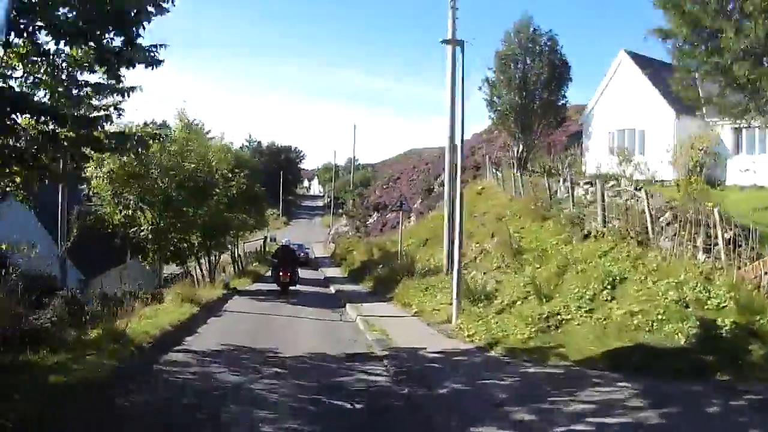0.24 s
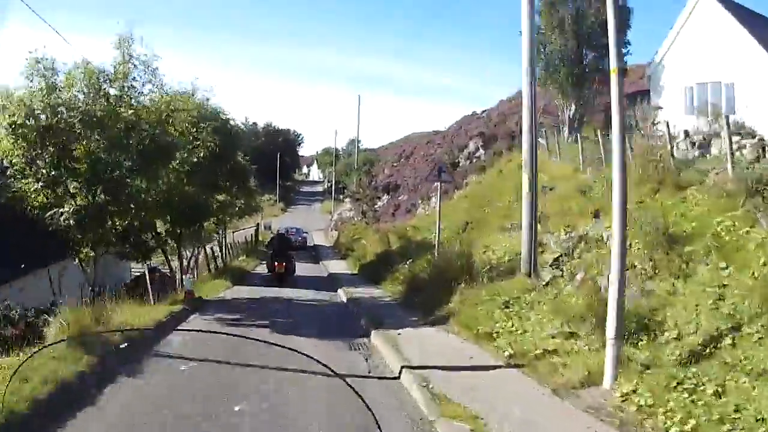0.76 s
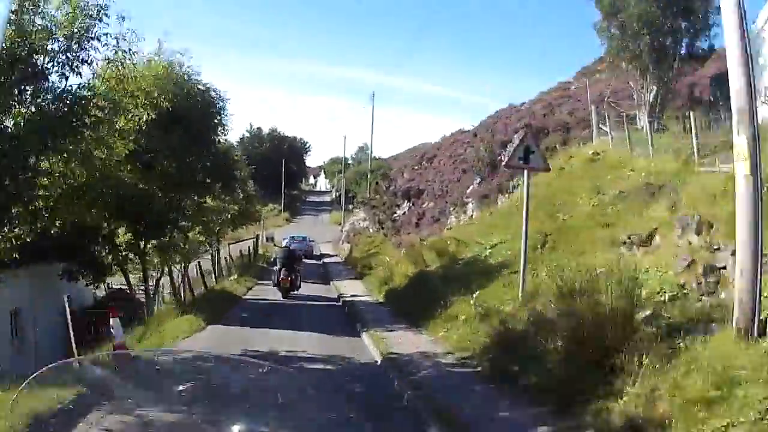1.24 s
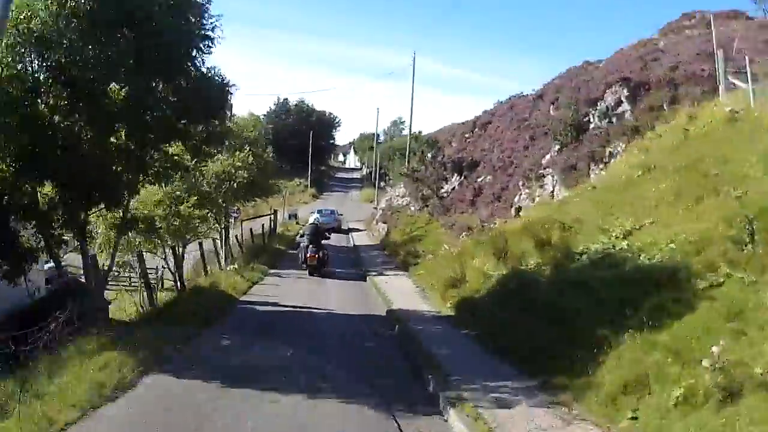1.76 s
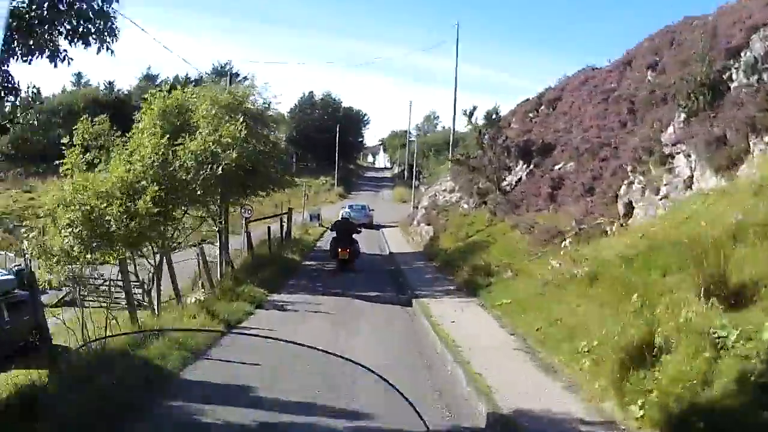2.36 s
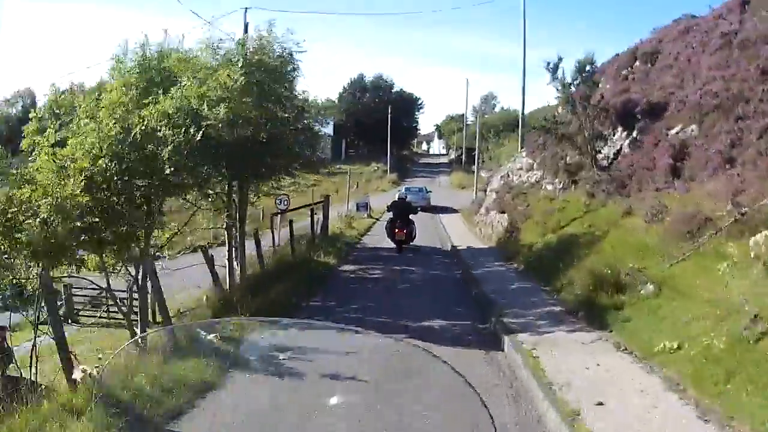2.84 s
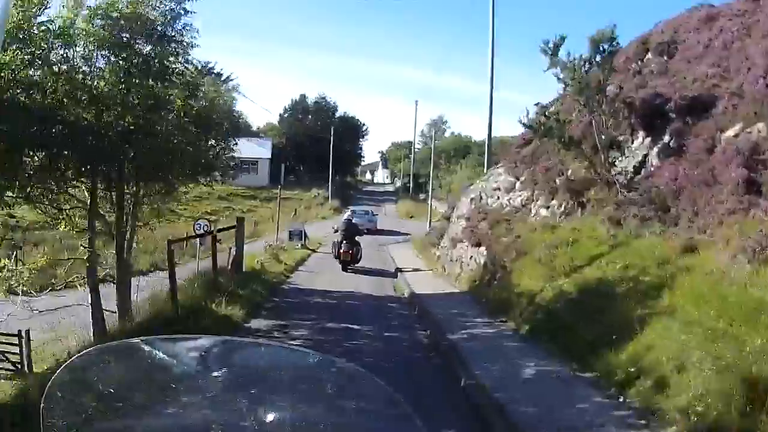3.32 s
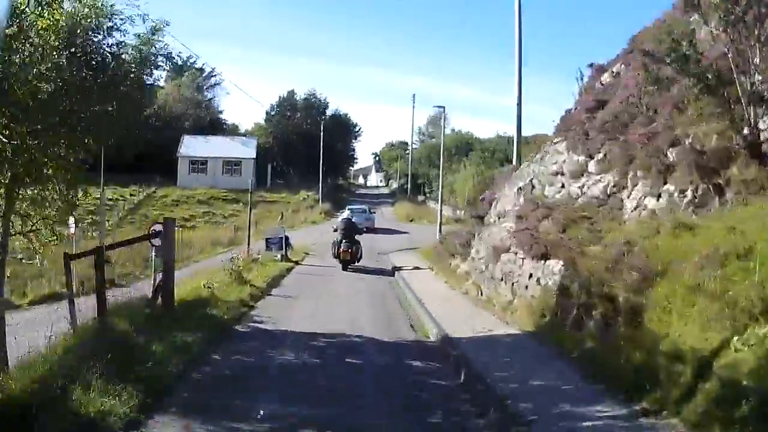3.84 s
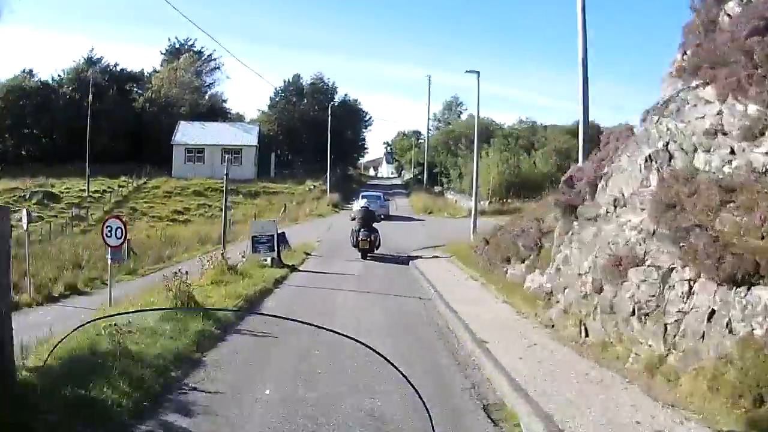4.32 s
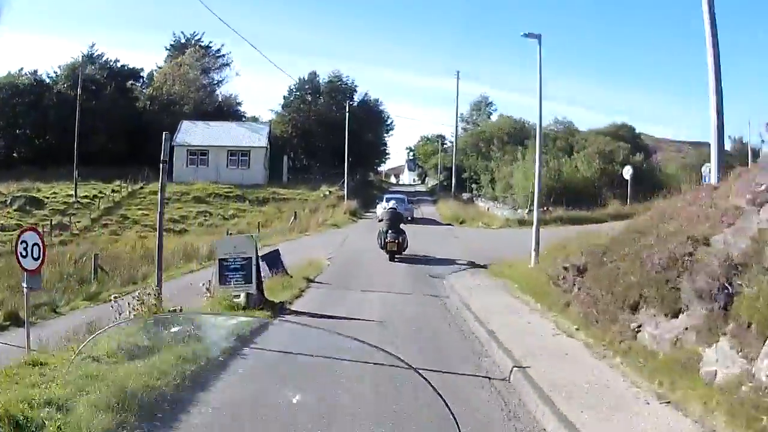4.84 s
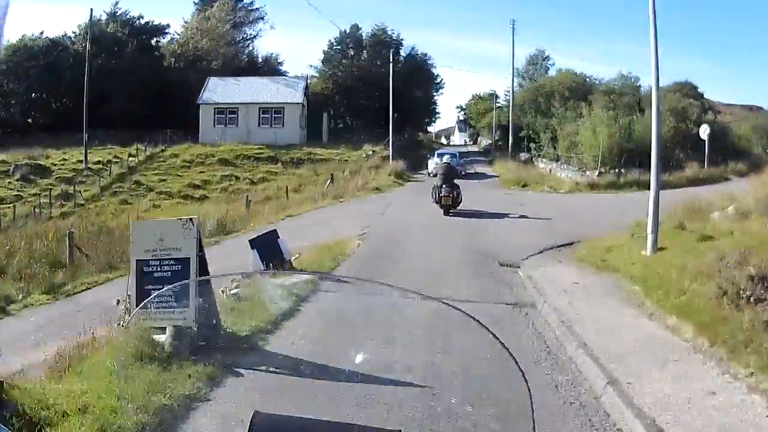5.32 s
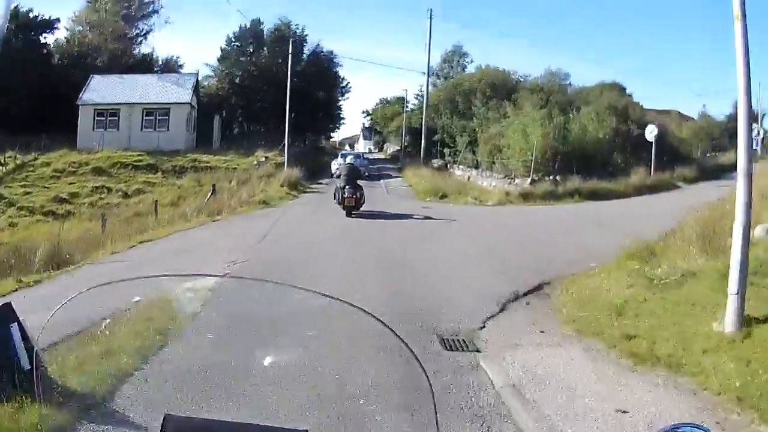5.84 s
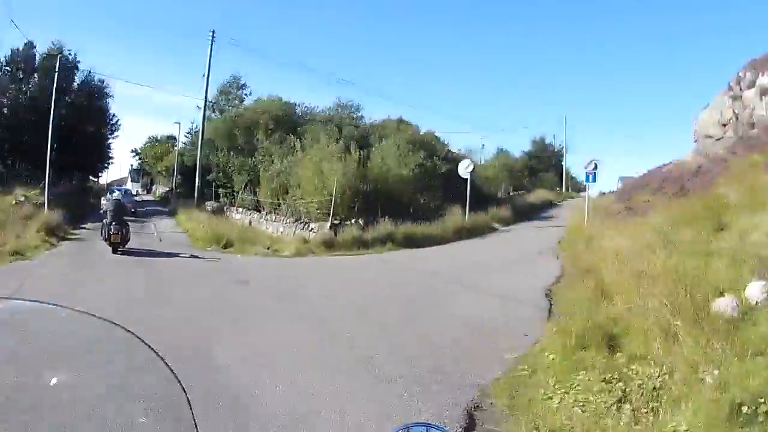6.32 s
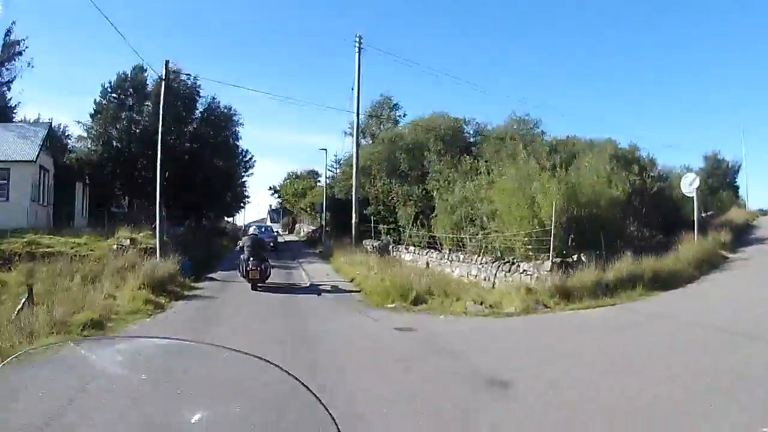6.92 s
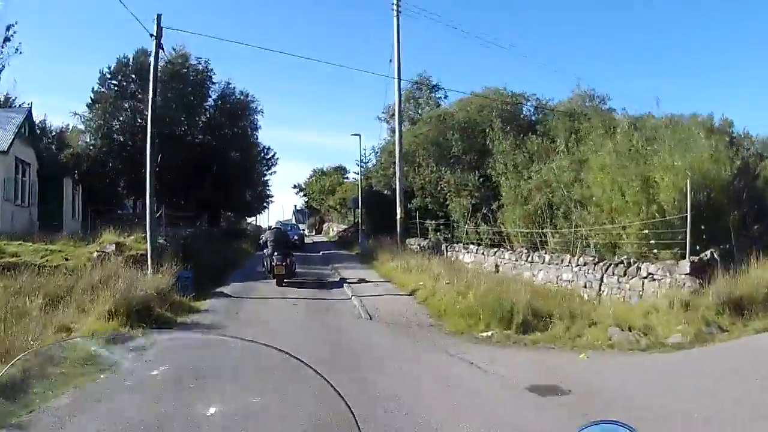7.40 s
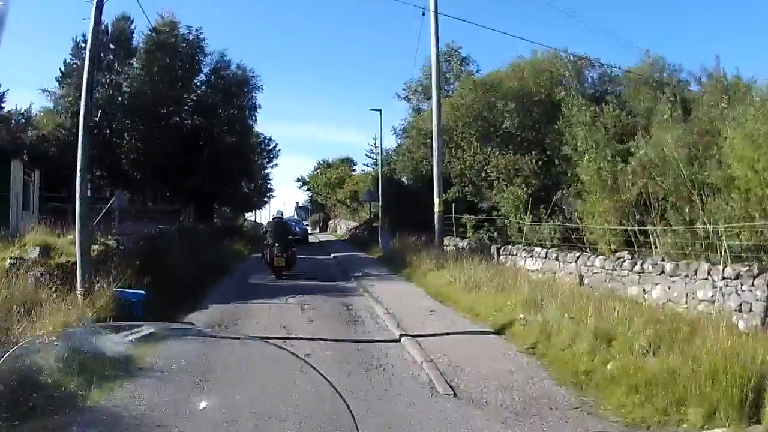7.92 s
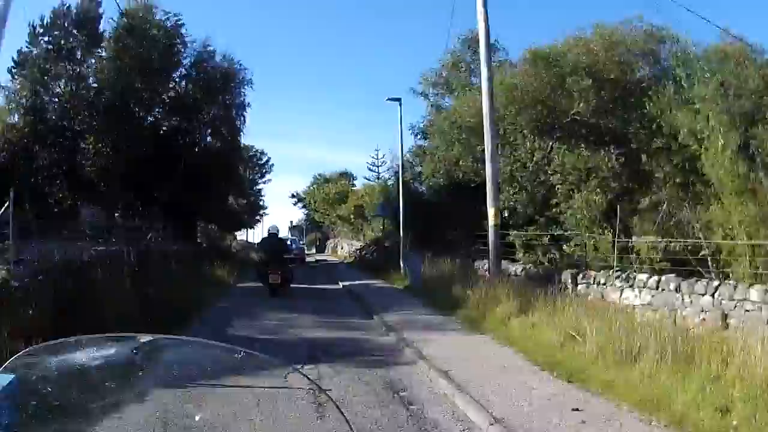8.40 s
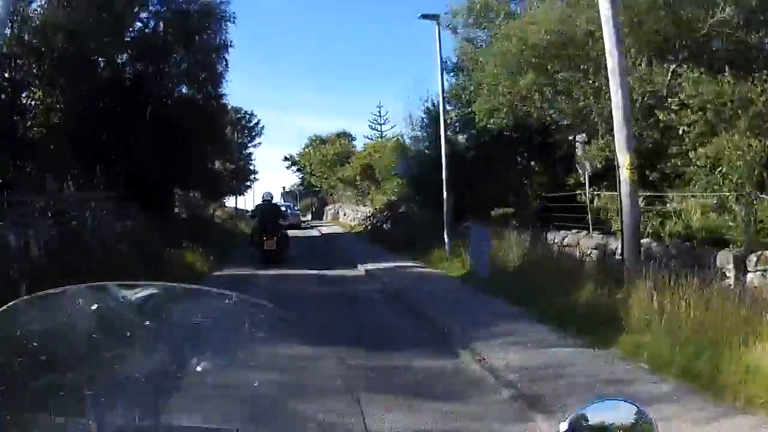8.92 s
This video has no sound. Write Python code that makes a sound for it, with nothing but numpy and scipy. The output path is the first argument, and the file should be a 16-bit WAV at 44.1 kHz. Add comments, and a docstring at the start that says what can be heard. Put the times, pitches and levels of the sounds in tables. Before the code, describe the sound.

Loud rasping wind gusts over the microphone of a moving motorcycle, with a low engine hum and road hiss underneath.

```python
"""Wind noise on a motorcycle

A motorcycle rolls along a narrow village road, heard at a microphone behind its windscreen. Turbulent
eddies excite the microphone port's resonance near 4 kHz in rasping bursts that overload the input.
Below them the wind buffets the housing, an edge whistles, cavities ring and the tyres hiss, while the
engine hums low, picking up after a junction."""
import sys
import numpy as np
from scipy import signal
from scipy.fft import rfft, irfft, next_fast_len
from scipy.io import wavfile
from scipy.ndimage import uniform_filter1d

SR = 44100
rng = np.random.default_rng(int(sys.argv[2]) if len(sys.argv) > 2 else 0)


def wrap_up_sound(samples):
    """Save the sound to the file named by the first command line argument, as 16-bit audio."""
    columns = np.atleast_2d(samples).T
    # keep every value between -1 and 1, then stretch to whole-number steps
    tamed = np.clip(columns, -1, 1)
    steps = np.round(tamed * 32767).astype(np.int16)
    wavfile.write(sys.argv[1], SR, steps)


N = 403956
TIME = np.arange(N) / SR


def undb(db):
    """Amplitude ratio of a level in decibels."""
    return 10 ** (np.asarray(db) / 20)


def unit(x):
    """Normalisation to a standard deviation of 1."""
    return x / np.std(x)


def curves(table):
    """Linear interpolation in time of each column after the first."""
    times, *columns = np.transpose(table)
    return [np.interp(TIME, times, column) for column in columns]


def spectrum_gain(freqs, points):
    """Interpolation of (frequency [Hz], level [dB]) points over log frequency, as a gain."""
    hz, db = np.transpose(points)
    return undb(np.interp(np.log(freqs), np.log(hz), db))


def shaped_noise(gain_at):
    """Spectral shaping: white noise weighted by a gain at each frequency, with rms 1."""
    size = next_fast_len(N)
    hz = np.maximum(np.fft.rfftfreq(size, 1 / SR), 1)
    return unit(irfft(rfft(rng.standard_normal(size)) * gain_at(hz), size)[:N])


def coloured_noise(points):
    """Noise of rms 1 whose spectral envelope follows (frequency [Hz], level [dB]) points."""
    return shaped_noise(lambda f: spectrum_gain(f, points))


def wander(rate_hz):
    """Random modulation: straight ramps between Gaussian values, with standard deviation 1."""
    hold = max(int(SR / rate_hz), 1)
    steps = rng.standard_normal(N)[:N // hold + 1]
    return unit(uniform_filter1d(np.repeat(steps, hold)[:N], hold))


def envelope(age, length, rise_s, fall_s):
    """Exponential growth up to age 0, a plateau of the given length, then exponential decay."""
    return np.exp(np.minimum(age, 0) / rise_s - np.maximum(age - length, 0) / fall_s)


# Gusts spilling over the windscreen: (start [s], duration [s], level [dB])
GUSTS = [(0, 0.069, -20), (0.157, 0.021, -27), (0.296, 0.032, -18), (0.34, .03, -21.5), (.44, 0.086, -19),
         (.6, 0.081, -12.5), (0.695, 0.16, -21), (.96, 0.58, -20), (1.593, .14, -17), (1.889, 0.044, -22),
         (2.033, 0.19, -22), (2.379, 0.03, -16.5), (2.458, 0.25, -22), (2.766, 0.228, -14.5),
         (3.021, 0.052, -20.5), (3.151, 0.037, -25), (3.204, 0.4, -19.5), (3.661, 0.066, -19),
         (3.78, 0.12, -20), (3.928, 0.17, -27), (4.139, 0.089, -20.5), (4.294, 0.14, -24),
         (4.524, 0.054, -24.5), (4.638, 0.23, -26.5), (4.984, 0.098, -21.5), (5.139, 0.14, -21.5),
         (5.458, 0.069, -17), (5.53, 0.433, -12), (6.033, 0.36, -31), (6.798, 0.053, -24.5),
         (6.889, 0.075, -17.5), (7.012, 0.016, -22), (7.113, 0.12, -25), (7.41, .05, -18),
         (7.58, 0.15, -24.5), (7.81, 0.16, -22.5), (8.206, 0.15, -26), (8.422, 0.04, -17.5),
         (8.488, 0.17, -25.5), (8.8, 0.31, -27)]
def airflow(calm_db=-38.5):
    """Intermittent turbulence: the level in dB of the strongest gust at each moment, or of calm flow."""
    flow = np.full(N, undb(calm_db))
    for start, length, db in GUSTS:
        span = slice(*np.searchsorted(TIME, [start - .1, start + length + .3]))
        gust = undb(db) * envelope(TIME[span] - start, length, rise_s=0.014, fall_s=0.018)
        flow[span] = np.maximum(flow[span], gust)
    return 20 * np.log10(flow)


# Spectrum of tyres and open air: (frequency [Hz], relative level [dB])
HISS_SPECTRUM = [(300, 4.5), (1000, 1.5), (2300, 0.5), (3800, 0), (4800, 1), (5500, -7), (8500, -5.5),
                 (11000, -13), (13500, -11), (15200, -12)]
def road_hiss(flow_db, early_db=-38, late_db=-32.5, follow=0.024):
    """Broadband noise of tyres and air grows along the road and sinks slightly in the lulls."""
    level = np.linspace(early_db, late_db, N) + follow * (flow_db - flow_db.mean())
    return coloured_noise(HISS_SPECTRUM) * undb(level + 0.21 * wander(5.8))


# Engine speed and strength: (time [s], cycle rate [Hz], level [dB])
ENGINE_RUN = [(0, 41, -39), (1.1, 41.98, -36.5), (2.3, 39.56, -36.5), (3.5, 37.46, -42), (4.5, 37.1, -47),
              (5.3, 38.84, -36), (5.8, 39.9, -30.5), (6.2, 40.52, -34), (6.7, 41.83, -33.5),
              (7.4, 43.3, -31), (8.15, 44.76, -29.5), (8.6, 44.4, -31), (8.85, 43.57, -35.5),
              (9.16, 43.5, -40)]
# Exhaust harmonics 1, 2, 3 ... of the cycle rate: (relative level [dB])
EXHAUST_HARMONICS = [-24, -1.5, -13, -4.5, -8.5, -17, -14.5, -19, -41, -26]
def engine(trim_db=0.35, jitter=0.00384, lumpy_db=1.4, mesh_order=33, whine_db=-8):
    """Periodic firing, twice a cycle, gives a muffled harmonic series; meshing gears add a faint whine."""
    hz, level = curves(ENGINE_RUN)
    phase = 2 * np.pi * np.cumsum(hz * (1 + jitter * wander(14))) / SR
    exhaust = sum(undb(db) * np.sin(order * phase + rng.uniform(0, 2 * np.pi))
                  for order, db in enumerate(EXHAUST_HARMONICS, 1))
    whine = undb(whine_db) * np.sin(mesh_order * phase) * wander(60)
    return (unit(exhaust) + whine) * undb(level + trim_db + lumpy_db * wander(30))


# Cavity resonances: (frequency [Hz], width [Hz], relative level [dB])
CAVITY_MODES = [(1538, 190, 4), (1651, 180, 2.5)]
# Strength of their ringing: (time [s], level [dB])
CAVITY_LEVEL = [(0, -33.5), (3.2, -32.5), (5.08, -33), (5.4, -35), (6.1, -32), (6.6, -38), (7, -33),
                (8.2, -32.5), (8.8, -35.5), (9.05, -29.5)]
def cavities(waver_db=1.0):
    """Cavity resonance: passing air sustains a breathy, hollow band near 1.6 kHz."""
    level, = curves(CAVITY_LEVEL)
    band = shaped_noise(lambda f: sum(undb(db) / (1 + (2 * (f - hz) / width) ** 2)
                                      for hz, width, db in CAVITY_MODES))
    return band * undb(level + waver_db * wander(25))


# Air whistling at an edge: (time [s], frequency [Hz], level [dB])
EDGE_TONE = [(.1, 1480, -42), (.16, 1504, -21.5), (.33, 1496, -28.5), (.45, 1590, -21), (.76, 1580, -26.5),
             (1.1, 1624, -25), (1.45, 1573, -23.5), (1.63, 1630, -23.5), (1.94, 1577, -26.5),
             (2.28, 1584, -28.5), (2.42, 1646, -51), (2.6, 1590, -68)]
def edge_tone(trim_db=-1, half_width_hz=40, waver_hz=32):
    """Flow oscillating unsteadily at an edge radiates a narrow noise band around a wavering pitch."""
    hz, level = curves(EDGE_TONE)
    phase = 2 * np.pi * np.cumsum(hz + waver_hz * wander(35)) / SR
    in_phase, quadrature = (shaped_noise(lambda f: 1 / (1 + (f / half_width_hz) ** 2)) for _ in range(2))
    return undb(level + trim_db) * (in_phase * np.cos(phase) + quadrature * np.sin(phase))


# Headwind pressing on the housing: (time [s], level [dB])
HEADWIND = [(0, -27), (1.1, -27), (1.7, -25), (1.9, -30), (2.4, -30.5), (2.9, -26), (3.5, -30.5),
            (4.4, -28.5), (5.3, -28.5), (5.8, -34), (6.1, -29), (6.35, -28.5), (6.6, -33), (6.95, -26.5),
            (7.3, -30.5), (7.7, -28.5), (8.15, -29), (8.7, -29.5), (9.16, -24.5)]
# Response of the housing: (frequency [Hz], relative level [dB])
BOOM_SPECTRUM = [(40, -19), (100, -6), (140, -12), (185, -3.5), (222, 3.5), (262, -6), (330, -11.5),
                 (420, -15), (540, -14.5), (700, -22), (1200, -20.5), (2500, -50)]
# Pressure spectrum of large eddies: (frequency [Hz], relative level [dB])
RUMBLE_SPECTRUM = [(8, 4), (22, 9), (42, 11.5), (65, 3.5), (108, 7.5), (140, -1), (200, -31.5)]
def buffeting(flow_db):
    """Forced vibration: slow eddies rumble and make the housing boom near 220 Hz; both swell in gusts."""
    headwind_db, = curves(HEADWIND)
    gust_db = uniform_filter1d(flow_db - flow_db.mean(), size=3000)
    boom_db = -0.5 + 0.16 * gust_db + 2.5 * wander(28)
    rumble_db = np.linspace(-2, -6.5, N) + 0.13 * gust_db + 2 * wander(20)
    boom = undb(headwind_db + boom_db) * coloured_noise(BOOM_SPECTRUM)
    rumble = undb(headwind_db + rumble_db) * coloured_noise(RUMBLE_SPECTRUM)
    return boom + rumble


# Spectrum of a bright spit of hiss: (frequency [Hz], relative level [dB])
SPIT_SPECTRUM = [(1500, -18), (4000, -1), (8500, 0), (11000, -2), (15000, 0)]
def spit(start_s=3.559, rise_s=0.007, peak_db=-11):
    """A single noise transient: bright hiss swells quickly and decays exponentially."""
    age = np.maximum(TIME - start_s, 0) / rise_s
    return undb(peak_db) * age * np.exp(1 - age) * coloured_noise(SPIT_SPECTRUM)


def swirls(rate_hz, spread_db, max_sigma, rise_s, fall_s):
    """Amplitude modulation by swirls of random length and size, each rising faster than it decays."""
    swirl_index = np.cumsum(rng.random(N) < rate_hz / SR)
    size = undb(spread_db * np.minimum(rng.standard_normal(N), max_sigma)[swirl_index])
    poles = np.exp(-1 / (SR * np.array([rise_s, fall_s])))
    rising, falling = (signal.lfilter([1 - pole], [1, -pole], size) for pole in poles)
    return np.maximum(rising, falling)


def ticks(rate_hz=95, spread_db=4, fall_s=0.0011):
    """Shot noise: tiny lone eddies arrive at random, each a pressure spike with exponential decay."""
    arrivals = rng.random(N) < rate_hz / SR
    spikes = arrivals * undb(spread_db * np.minimum(rng.standard_normal(N), 1))
    return signal.lfilter([1], [1, -np.exp(-1 / (fall_s * SR))], spikes)


def stray_eddies(flow_db, count=340, length_s=0.0021, above_db=9, spread_db=5, top_db=-8):
    """Irregular vortex shedding scaled by the flow: rows of (start [s], duration [s], level [dB])."""
    when, duration, strength = rng.random((count, 3)).T
    starts = (np.arange(count) + when) / count * TIME[-1]
    lengths = length_s * np.exp(0.43 * (2 * duration - 1))
    levels = np.interp(starts, TIME, flow_db) + above_db + spread_db * (2 * strength - 1)
    return list(zip(starts, lengths, np.minimum(levels, top_db)))


# The hardest eddies to strike the port: (start [s], duration [s], level [dB])
HARD_EDDIES = [(0.043, 0.0074, -25), (0.125, 0.00089, -6), (0.228, 0.0012, -1), (0.391, 0.00097, -1),
               (0.416, 0.006, -6.5), (0.459, 0.0039, -3), (0.604, 0.0032, -5), (0.664, 0.0017, 6),
               (0.727, 0.0053, -7), (0.767, 0.0049, -2.5), (0.921, 0.0036, -9), (0.982, 0.0073, -7.5),
               (1.03, 0.0037, -1.5), (1.057, 0.0023, 1.5), (1.125, 0.0068, -6), (1.207, 0.0093, -5.5),
               (1.242, 0.0025, -0.5), (1.296, 0.0036, 0), (1.323, 0.0096, -4.5), (1.402, 0.0092, -5.5),
               (1.517, 0.0047, -1.5), (1.526, 0.0048, -6), (1.698, 0.025, -9), (1.729, 0.006, -3),
               (1.953, 0.0035, -6.5), (1.986, 0.0019, -3), (2.095, 0.0042, -3), (2.173, 0.0046, -9.5),
               (2.472, 0.0091, -10.5), (2.519, 0.005, -3), (2.575, 0.004, -7), (2.592, 0.012, -8.5),
               (2.674, 0.006, -2.5), (2.71, 0.0017, -3), (2.724, 0.0036, 1), (2.731, 0.014, -4.5),
               (2.763, 0.011, -2), (2.806, 0.03, -1.5), (2.852, 0.013, -1), (2.917, 0.015, 0.5),
               (2.966, 0.0097, -1), (3.075, 0.0063, -3), (3.21, 0.0051, -22), (3.245, 0.0054, -11),
               (3.418, 0.0072, -11), (3.47, 0.017, -9.5), (3.577, 0.0099, -7), (3.774, 0.01, -6.5),
               (3.811, 0.0021, -4), (3.894, 0.0057, -5.5), (4.08, 0.0025, -10), (4.146, 0.0088, -7),
               (4.167, 0.013, -6), (4.237, 0.0085, -8), (4.281, 0.0084, -4), (4.483, 0.0046, -5),
               (4.545, 0.0024, -6), (4.628, 0.0016, -1.5), (4.678, 0.003, -7.5), (4.735, 0.0095, -4.5),
               (4.771, 0.0063, -8.5), (4.823, 0.0064, -11), (4.861, 0.0044, -11.5), (4.986, 0.011, -0.5),
               (4.999, 0.013, -11.5), (5.21, 0.018, -10.5), (5.494, 0.0086, -8), (5.55, 0.032, -5.5),
               (5.639, 0.022, -5), (5.69, 0.094, -6.5), (5.8, 0.047, -6.5), (5.845, 0.048, -6.5),
               (5.94, 0.014, -5), (5.958, 0.026, -7), (6.05, 0.0046, -4.5), (6.119, 0.0033, -7.5),
               (6.168, 0.0023, -10), (6.382, 0.0051, -10), (6.582, 0.0054, -12), (6.892, 0.0066, -9),
               (6.963, 0.0072, -14), (7.016, 0.0047, -13.5), (7.182, 0.0092, -13.5), (7.424, 0.005, -4),
               (7.527, 0.0056, -12), (7.643, 0.004, -3), (7.676, 0.0066, -4.5), (7.819, 0.005, -10),
               (7.945, 0.013, -15), (8.008, 0.014, -11.5), (8.111, 0.0029, -8.5), (8.26, 0.005, -9),
               (8.366, 0.0056, -10.5), (8.411, 0.0045, -18), (8.439, 0.014, -7), (8.779, 0.0098, -10.5),
               (8.928, 0.0019, -2), (8.974, 0.008, -10.5), (9.143, 0.0021, -1)]
def eddy_strength(flow_db, sag_db=4.5):
    """Incoherent summation: hard and stray eddies add in power; each strikes, sags and dies away."""
    power = np.zeros(N)
    for start, length, db in HARD_EDDIES + stray_eddies(flow_db):
        span = slice(max(int((start - .01) * SR), 0), int((start + length + .02) * SR))
        age = TIME[span] - start
        sagging = undb(db - sag_db * np.clip(age / length, 0, 1))
        power[span] += (sagging * envelope(age, length, rise_s=0.00048, fall_s=0.0011)) ** 2
    return np.sqrt(power)


def faltering(depth_db=5, lead_s=0.016, billow_db=1.2):
    """Unsteady flow, as a swing in dB: the stream billows and stalls just before each hard eddy."""
    dip = np.zeros(N)
    for start, _, _ in HARD_EDDIES:
        dip[slice(*np.searchsorted(TIME, [start - lead_s, start]))] = depth_db
    return billow_db * np.minimum(wander(55), 1) - dip


def resonator(drive, points, size=1024):
    """Minimum-phase filtering by (frequency [Hz], level [dB]) points; white noise keeps its power."""
    hz = np.maximum(np.fft.rfftfreq(size, 1 / SR), 1)
    cepstrum = irfft(np.log(spectrum_gain(hz, points)))
    lag = np.arange(size)
    causal = (lag > 0) & (lag < size // 2)
    response = irfft(np.exp(rfft(2 * cepstrum * causal)))
    return signal.fftconvolve(drive, response / np.linalg.norm(response))[:N]


# Response of the microphone port: (frequency [Hz], relative level [dB])
PORT_RESPONSE = [(150, -16), (500, -23.5), (1000, -17), (1500, -12.5), (2200, -8), (3000, -5), (3600, -2),
                 (3980, 2), (4400, -5), (5200, -13), (6500, -20), (9000, -27.5), (12000, -69), (15500, -32)]
def port_ringing(strength, low_ratio=0.96, high_ratio=1.059):
    """Damped resonance: pressure grains ring the port, lower or higher as the eddies change angle."""
    blend = np.pi / 4 * (1 + np.tanh(wander(70)))  # equal-power crossfade between two tunings
    ringing = np.zeros(N)
    for share, ratio in ((np.cos(blend), low_ratio), (np.sin(blend), high_ratio)):
        grains = share * strength * rng.choice([-1, 1], N)
        ringing += resonator(grains, [(hz * ratio, db) for hz, db in PORT_RESPONSE])
    return ringing


def port_rasp(flow_db, swirl_db=-6, tick_db=9, grain_db=4):
    """Turbulent cascade: swirls within swirls crackle into the port, most wildly on the first stretch."""
    coarse = swirls(190, spread_db=np.linspace(12.5, 7, N), max_sigma=1, rise_s=0.00023, fall_s=0.00057)
    fine = swirls(700, spread_db=4, max_sigma=1.7, rise_s=0.0001, fall_s=0.00018)
    swirling = undb(flow_db + swirl_db) * coarse * fine
    ticking = undb(flow_db + tick_db) * ticks()
    strength = np.sqrt(swirling ** 2 + ticking ** 2 + eddy_strength(flow_db) ** 2)
    graininess = undb(grain_db * np.minimum(wander(1100), 1.8))
    ringing = port_ringing(strength * graininess)
    # The hardest grains tear off a fine, bright spray that lasts as long as the ringing.
    spray_db = np.linspace(-14, -20, N) + 2.1 * np.minimum(wander(250), 2)
    hardness = uniform_filter1d(np.minimum(np.abs(ringing), .7) ** 2, size=24)
    spray = undb(spray_db) * hardness * shaped_noise(lambda f: f / (f + 5000))
    return ringing + spray


def scene():
    """Superposition of wind noise, engine and road in one channel."""
    flow_db = airflow()
    wind = port_rasp(flow_db + faltering()) + spit() + buffeting(flow_db) + edge_tone() + cavities()
    return (wind + engine() + road_hiss(flow_db))[None]


def record(dry, ceiling=0.65, knee=9, dc_offset=-0.021, cutoff_hz=15500):
    """Saturation: the input, resting just off zero, flattens the peaks; a low-pass limits the band."""
    saturated = dry / (1 + np.abs(dry / ceiling) ** knee) ** (1 / knee)
    lowpass = signal.ellip(8, .1, 50, cutoff_hz, fs=SR, output="sos")
    return signal.sosfiltfilt(lowpass, saturated + dc_offset)


dry = scene()
out = record(dry)
wrap_up_sound(out)
```